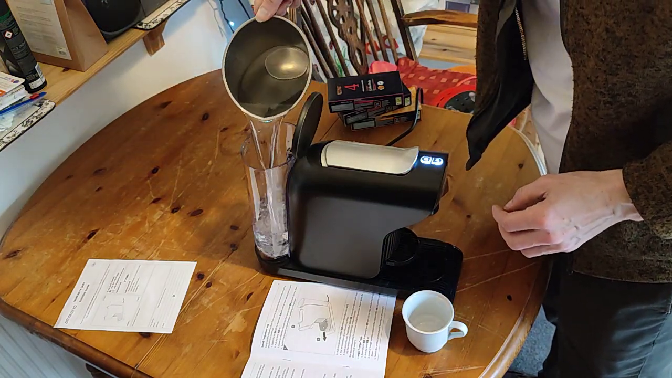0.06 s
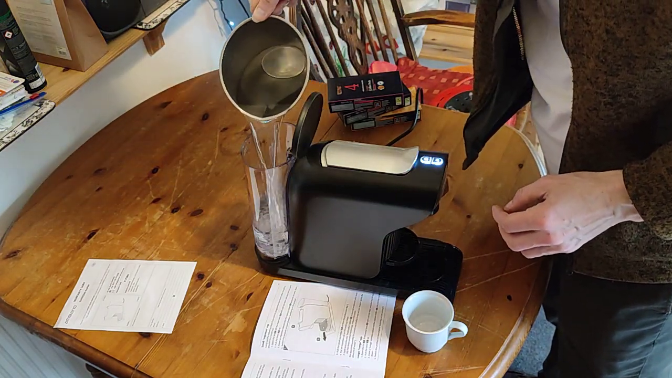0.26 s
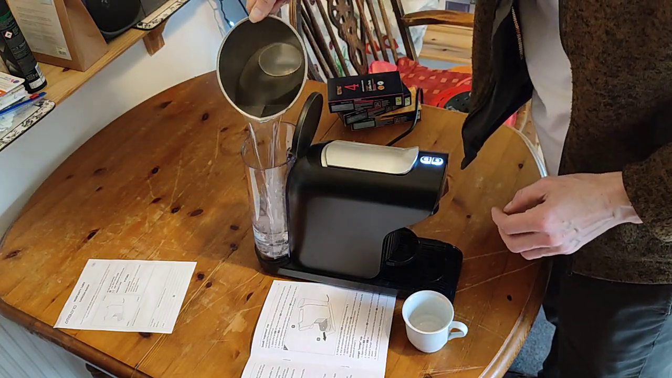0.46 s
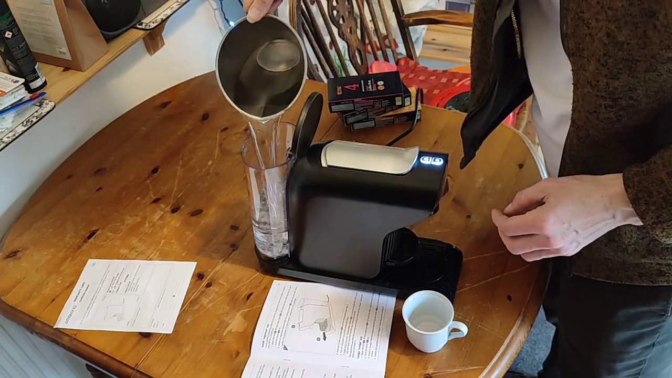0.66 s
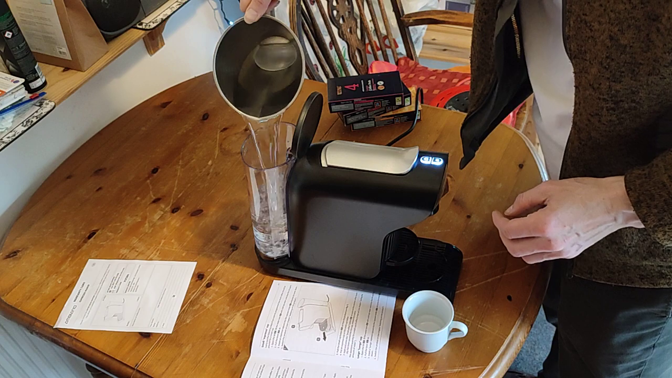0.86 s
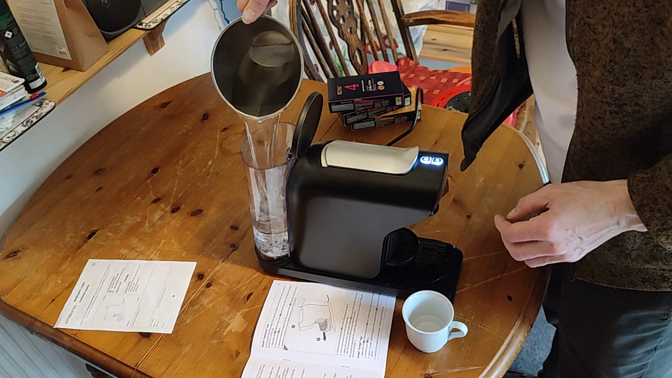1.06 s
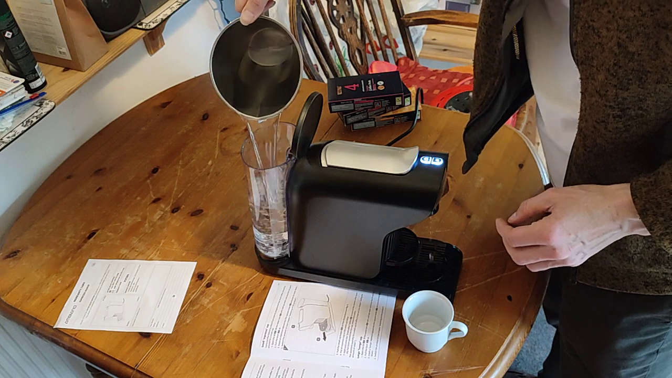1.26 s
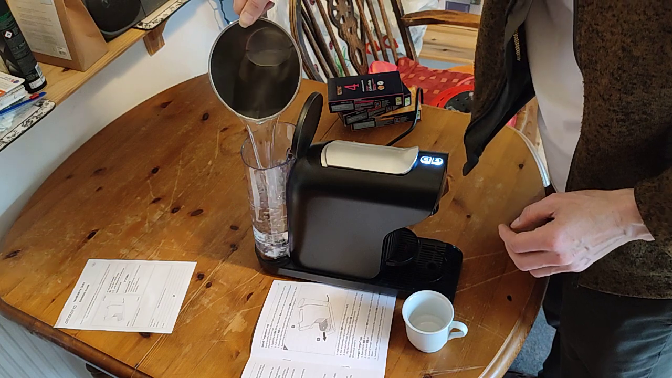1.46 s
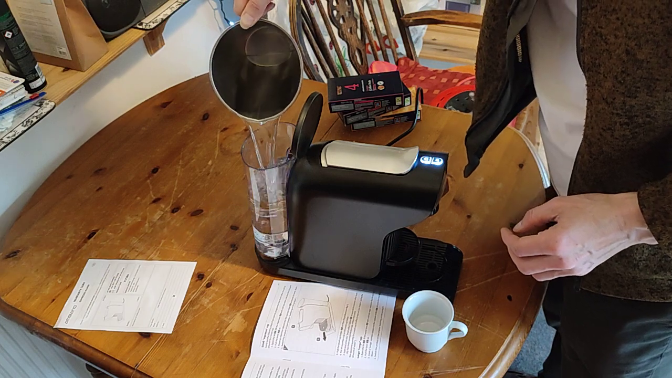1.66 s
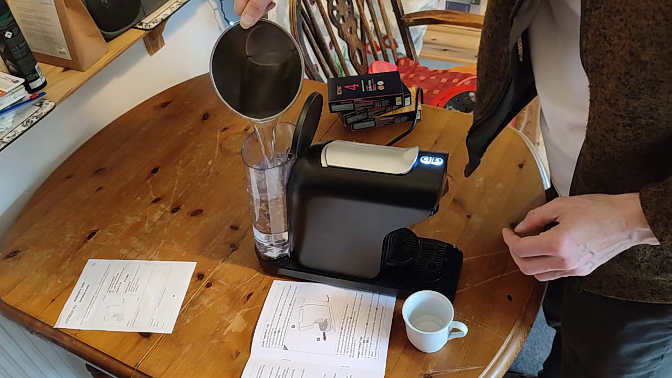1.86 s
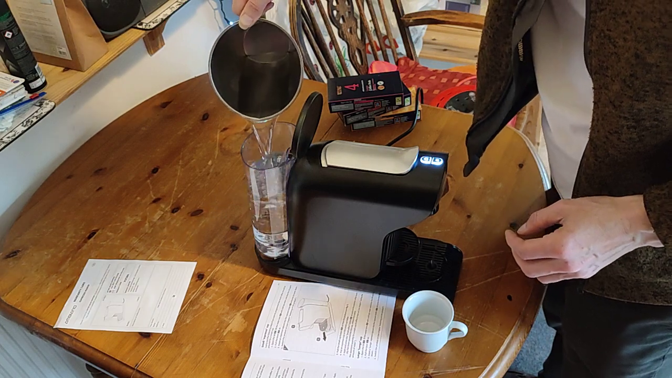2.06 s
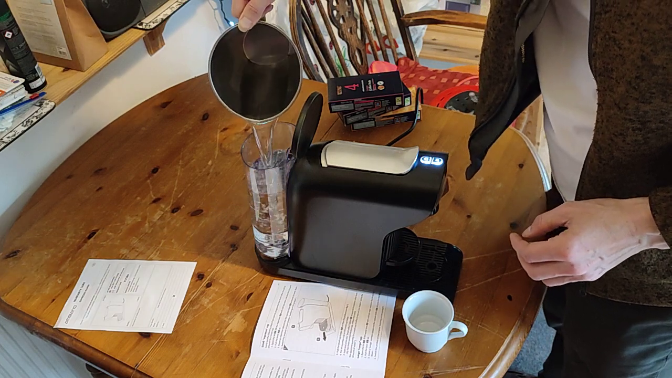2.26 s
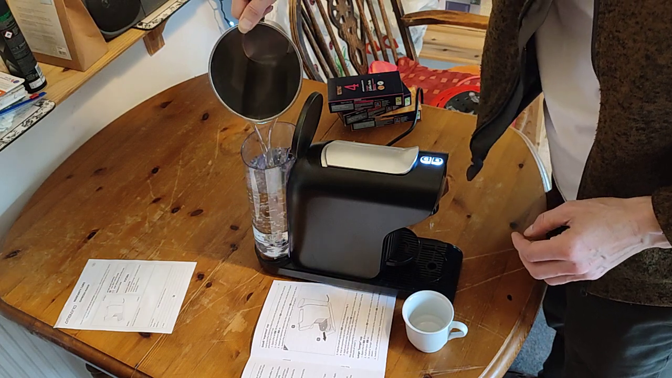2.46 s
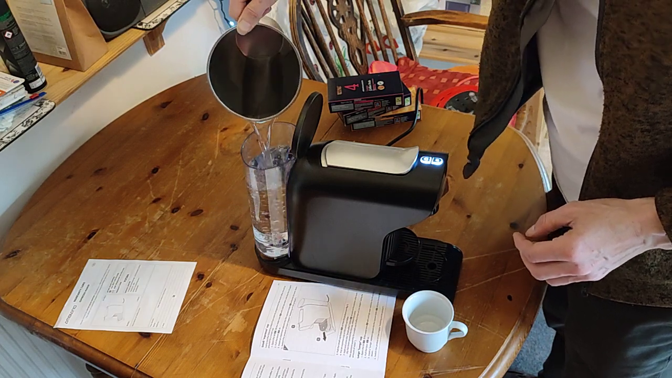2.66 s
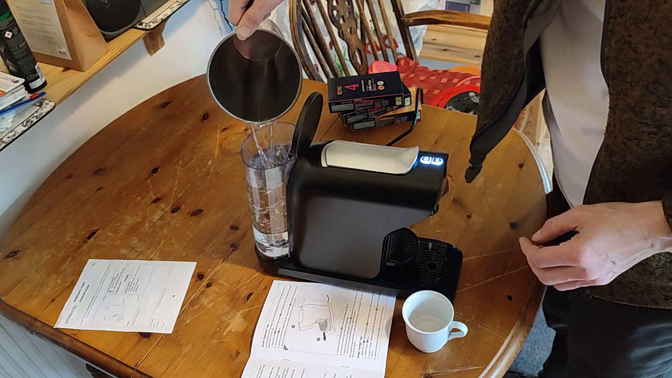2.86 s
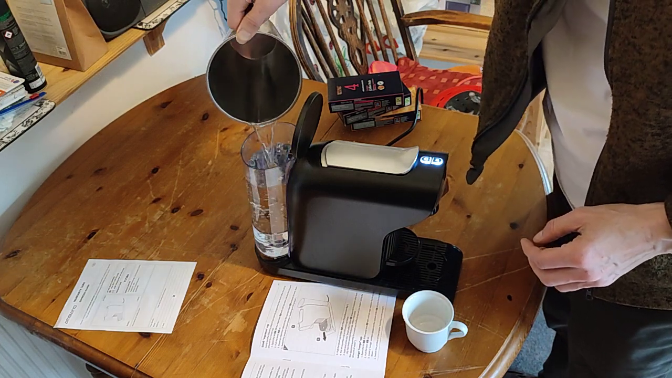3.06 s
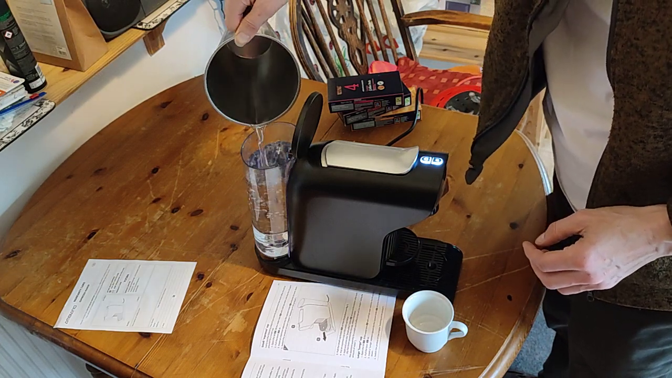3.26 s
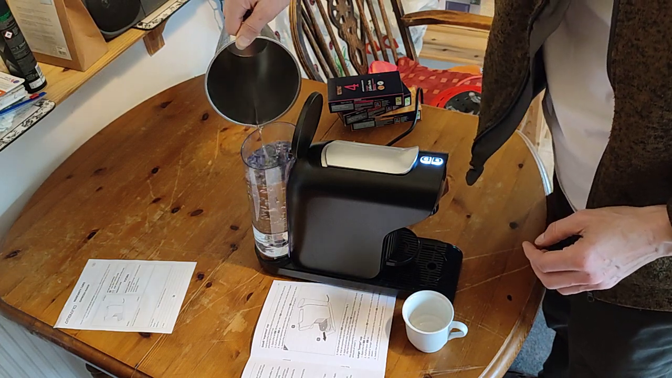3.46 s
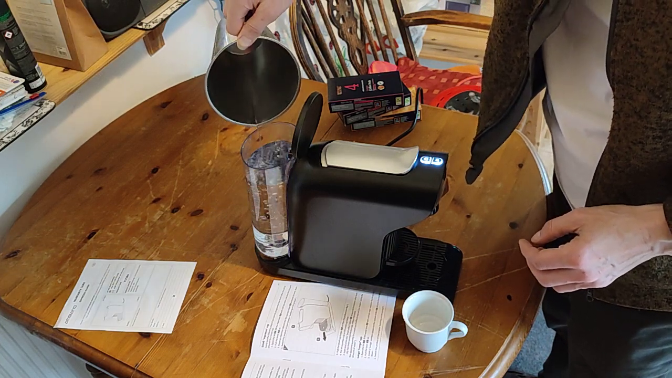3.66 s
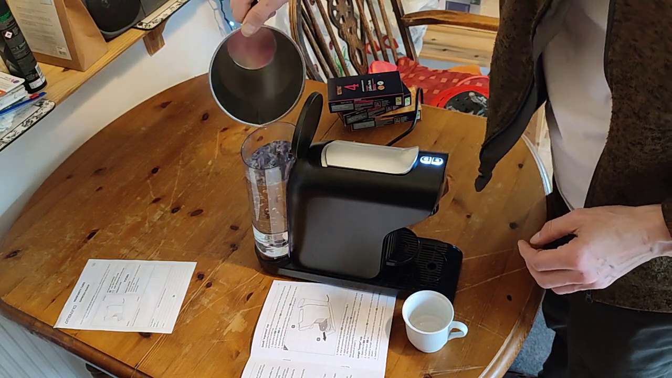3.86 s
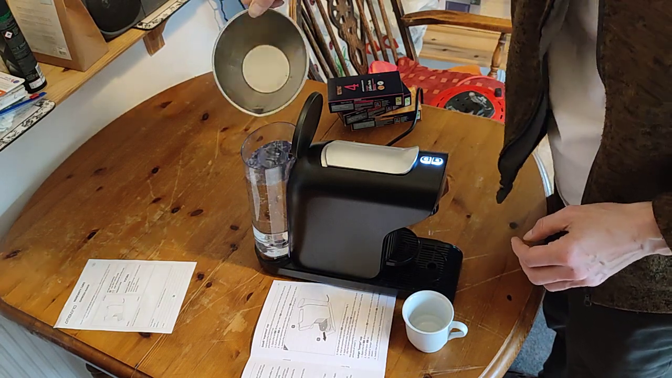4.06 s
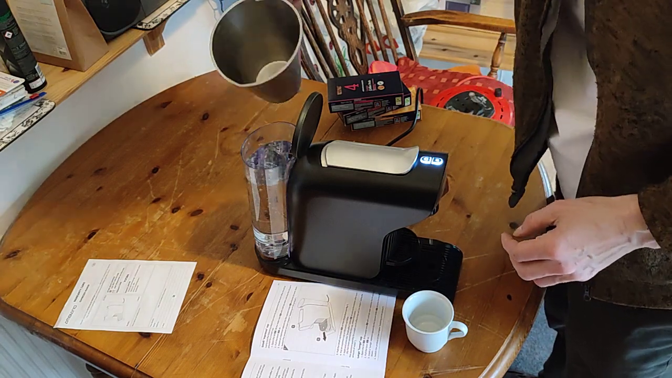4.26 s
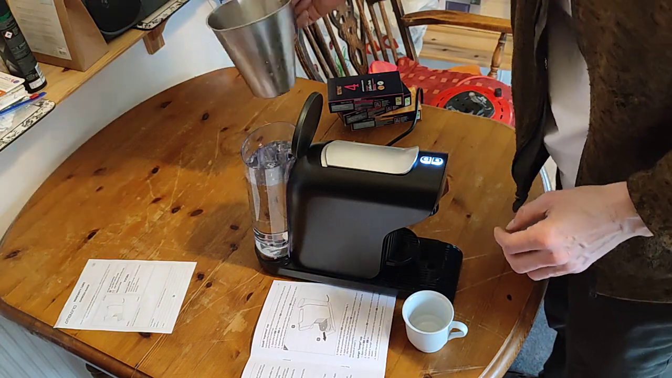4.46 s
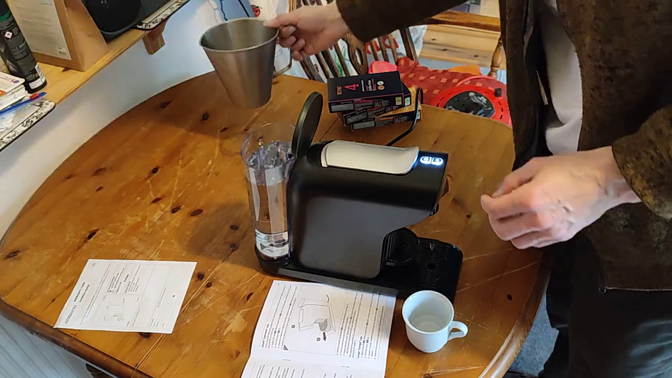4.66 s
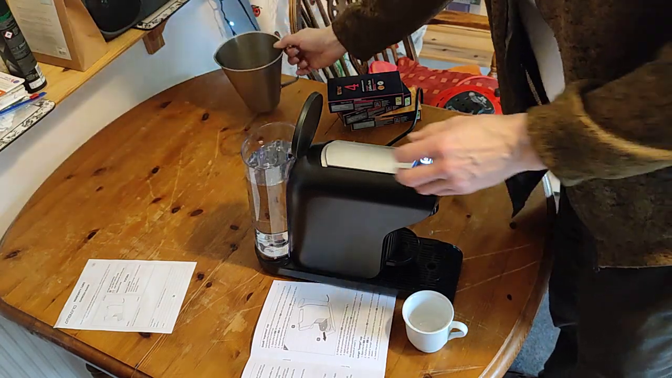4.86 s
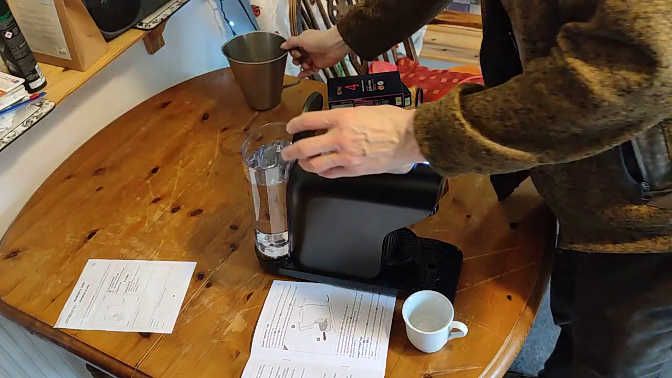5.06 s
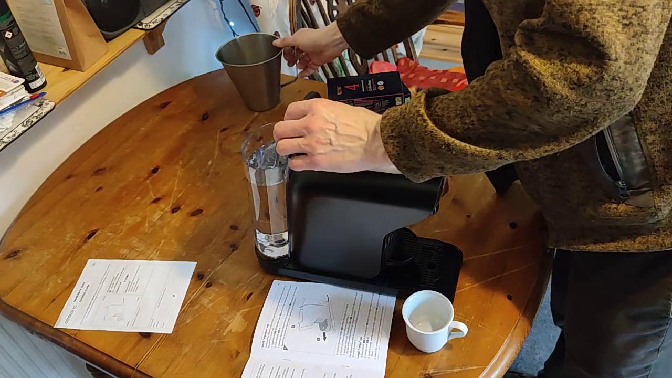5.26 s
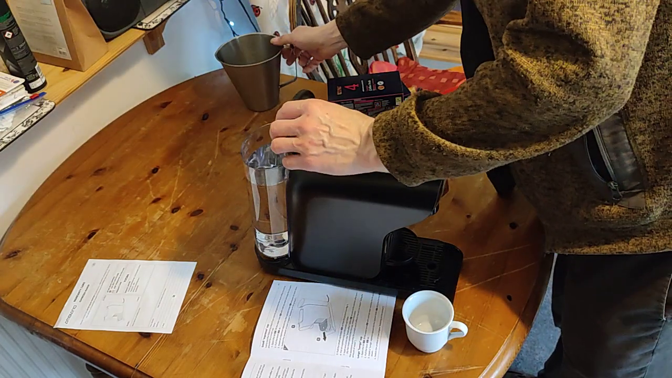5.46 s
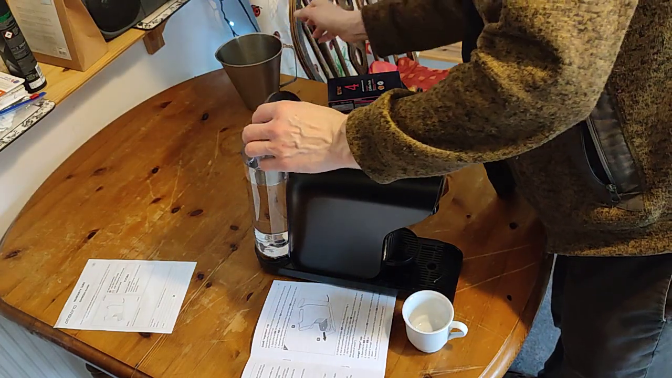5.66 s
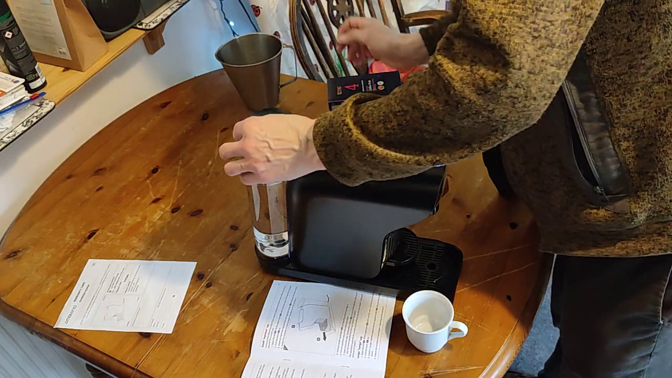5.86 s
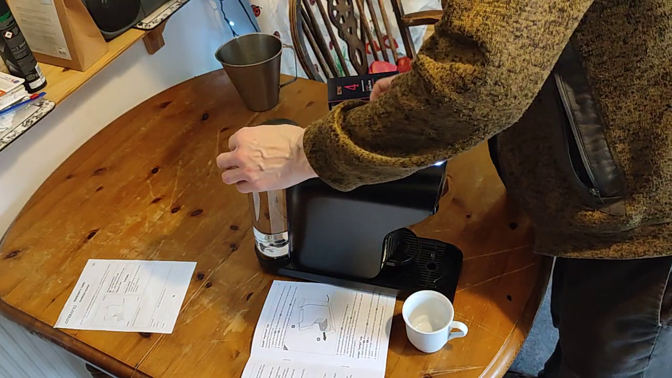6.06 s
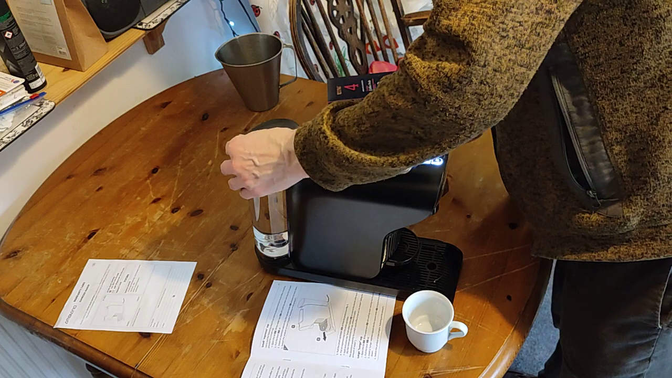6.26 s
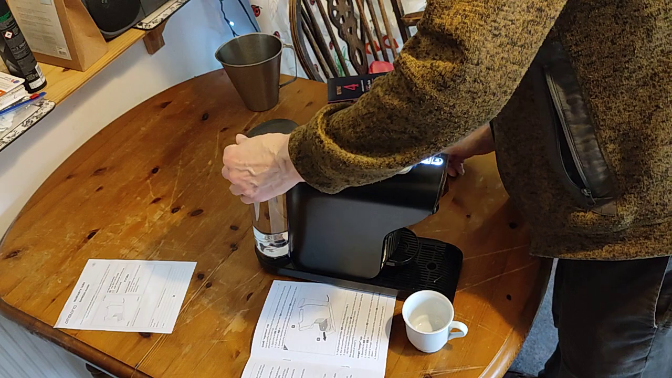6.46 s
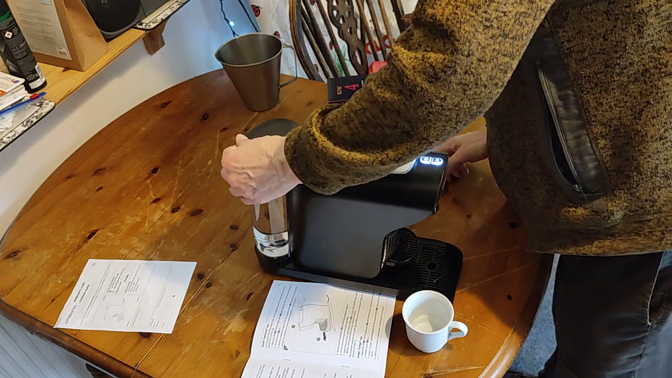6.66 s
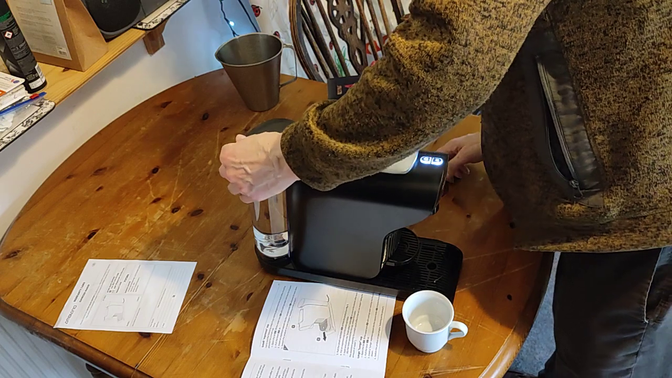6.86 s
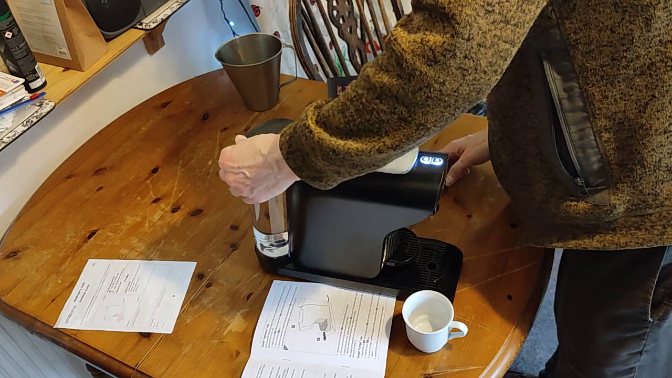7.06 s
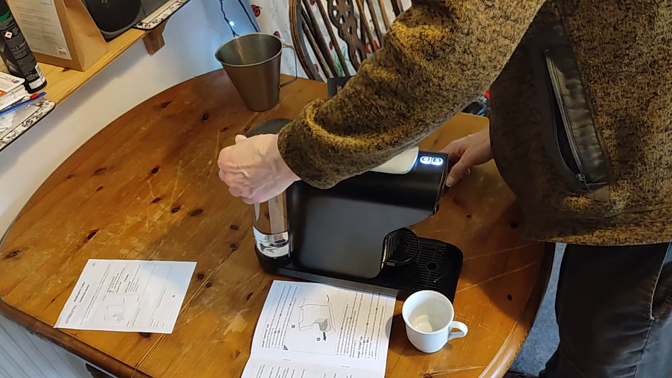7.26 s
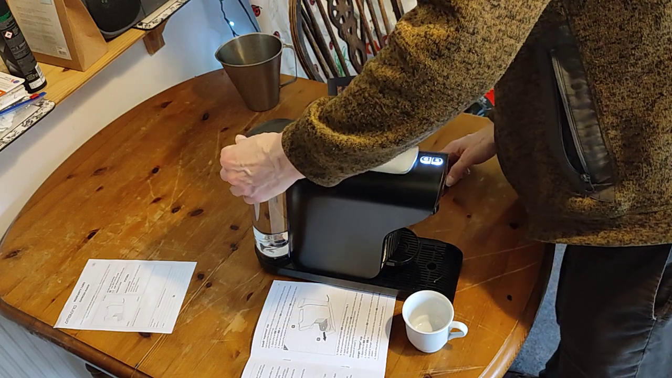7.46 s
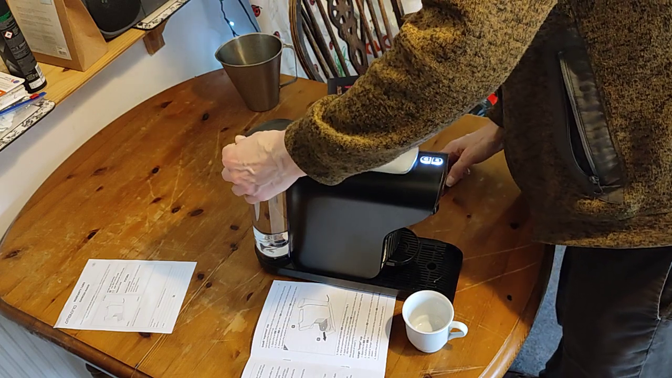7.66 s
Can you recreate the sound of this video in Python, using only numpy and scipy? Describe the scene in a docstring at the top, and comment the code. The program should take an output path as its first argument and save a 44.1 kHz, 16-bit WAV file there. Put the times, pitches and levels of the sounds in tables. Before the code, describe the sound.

Close in a small quiet kitchen, water splashes into a narrow plastic tank with a crackling patter and hollow drumming, soon softening to gurgles and single bubbly plips. After a near-silent pause with faint sleeve rustle, a metal jug lands hard on a wooden table, rocks flat, and a plastic lid is knocked and clacked shut. Stereo phone microphone, faint room hiss and low air rumble.

```python
"""A small kitchen: water is poured from a steel jug into a coffee machine's narrow plastic tank on a wooden table.
Random impacts, coloured and sent through the room, patter on the tank wall, then thin to a trickle with
single bubbles made of decaying sines. Coloured impacts rustle as a sleeve; banks of decaying modes and noise
bursts set the jug down hard, rock it flat and press the lid shut. A phone's two microphone ports listen."""
import sys
import numpy as np
from scipy import signal
from scipy.fft import rfft, irfft, next_fast_len
from scipy.io import wavfile

SR = 44100
rng = np.random.default_rng(int(sys.argv[2]) if len(sys.argv) > 2 else 0)


def wav_out(sig):
    """Save sig, one row per channel (or a flat mono array), as 16-bit PCM at SR to the path in sys.argv[1]."""
    wavfile.write(sys.argv[1], SR, np.round(np.clip(np.atleast_2d(sig).T, -1, 1) * 32767).astype(np.int16))


N = 339966
TIME = np.arange(N) / SR  # seconds

# Spectrum of the quiet kitchen. Each row: frequency in Hz, level in dB.
KITCHEN_COLOUR = [(20, 12.5), (45, 7.5), (90, 5), (135, 1.5), (200, -1.5), (400, -7.5), (510, -8),
                  (630, -8.5), (1000, -14.5), (1900, -12), (2350, -9.5), (2750, -15), (7000, -22.5),
                  (9000, -18), (12000, -12), (15500, -11)]
# Spectrum of air rumbling on the microphone. Each row: frequency in Hz, level in dB.
RUMBLE_COLOUR = [(3, -12.5), (11, -1.0), (18, -11), (30, -23), (60, -34.0), (200, -71), (1000, -110)]
# A steady rumble, and an early draught that dies away slowly.
RUMBLE_DB, DRAUGHT_DB, DRAUGHT_END_S, DRAUGHT_T60_S = -62, -54.5, 0.73, 7.6
ROOM_T60_S, ROOM_TREBLE_T60_S = 0.3, 0.13

# Spectrum of droplets on wall and water. Each row: frequency in Hz, level in dB.
PATTER_COLOUR = [(100, -20), (250, 0), (450, 5), (1000, -7.5), (1700, 4), (3000, 2.5), (4500, -5),
                 (7500, -2), (11000, -0.5), (15000, -4.5)]
# Spectrum of the tiny trapped bubbles. Each row: frequency in Hz, level in dB.
FIZZ_COLOUR = [(1000, -13.5), (2000, -13.5), (4000, 3), (8000, 5.5), (15000, 8)]
# The patter softens as the water deepens, and dies away once the stream meets the water.
PATTER_END_S, PATTER_DB, PATTER_SAG_DB_PER_S, PATTER_T60_S = 1.09, -52.5, 4.5, 0.8
# A quiet trickle runs beneath it and on until the jug is tipped back, then fades.
TRICKLE_END_S, TRICKLE_DB, TRICKLE_T60_S = 3.75, -77, 3
# Resonances of the plastic tank. Each row: frequency in Hz, level in dB, t60 in seconds, left minus right in dB.
TANK_MODES = [(129.8, -16, 0.077, 6), (256.4, 4.5, 0.092, 0.5), (307, -11.5, 0.085, -5),
              (560, -7, 0.095, -4), (679, 12, 0.076, -1), (895, -7, .05, 0)]
# Heavy slugs of water drum on the tank. Each row: start in seconds, level in dB.
SLUGS = [(0.077, -58.5), (.188, -55), (0.407, -58.5), (.579, -54.5), (.673, -53), (.836, -64),
         (.924, -58.5), (1.027, -57.5), (1.11, -62), (1.308, -63), (1.407, -62.5), (1.467, -63.5)]
DRUM_DB = -21  # the lighter drumming between them, against the patter

# The air above the water sings, mostly rising as the tank fills. Each row: time in seconds, pitch in Hz.
AIR_PITCH = [(0, 537), (.42, 531), (.56, 635), (.95, 655), (1.25, 656)]
# Its level against the patter, and one surge of the stream that makes it sing out.
AIR_DB, SURGE_S, SURGE_WIDTH_S, SURGE_DB = -11.5, 0.94, 0.015, -53

# Spectrum of the bubbles under the surface. Each row: frequency in Hz, level in dB.
BUBBLE_COLOUR = [(400, 1), (900, -6.5), (1400, -4), (2200, -1.5), (3000, 4), (5000, -15.5), (8000, -4),
                 (15000, 7)]
# The patter drags bubbles under, softer as the water deepens (level against the patter, before the trim).
DRAGGED_AIR_DB, DRAGGED_AIR_SAG_DB_PER_S = -5, 2.5
# The trickle breaks up and gurgles. Each row: start in seconds, length in seconds, relative bubbling level in dB.
GURGLES = [(1.277, 0.18, -66.5), (1.705, 0.47, -72), (2.06, 0.39, -66), (2.474, 0.42, -72.5),
           (3.317, .06, -74.5), (3.527, 0.12, -68.5)]
GURGLE_ATTACK_S, GURGLE_T60_S, GURGLE_SPRAY_DB = 0.052, 0.48, -3  # spray against the gurgling
# The largest single bubbles; the last four come ever lower.
# Each row: start in seconds, relative level in dB, starting pitch in Hz, cycles of ring to 60 dB down.
BUBBLES = [(.056, -41.5, 526, 20), (0.246, -48.5, 516, 16), (1.145, -47, 3010, 51),
           (1.268, -49.5, 4200, 59), (1.313, -52.5, 825, 11), (1.46, -55.5, 880, 25),
           (1.9, -36.5, 5300, 21), (2.023, -40, 8000, 24), (2.088, -44, 1050, 11.5), (2.139, -37, 6940, 28),
           (2.151, -49, 1010, 18), (2.166, -44, 4210, 48), (2.187, -42.5, 946, 17), (2.294, -41, 7290, 110),
           (2.297, -43, 6800, 64), (2.319, -50, 1004, 42), (2.347, -40, 1040, 5.6), (2.535, -50, 1150, 9.5),
           (2.677, -52.5, 8130, 200), (2.847, -55, 2560, 79), (2.904, -58.5, 873, 34),
           (3.464, -55.5, 1460, 30), (3.547, -52.5, 1620, 30), (3.584, -55, 2820, 52),
           (3.626, -48.5, 1260, 43), (3.666, -53, 1100, 25), (3.691, -53.5, 980, 46)]
# The loudest splashes and bursting bubbles. Each row: start in seconds, relative level in dB, centre in Hz.
SPLASHES = [(0.269, -49.5, 1810), (0.408, -52, 2100), (.521, -52, 2200), (.885, -45.5, 2000),
            (0.929, -42, 1900), (.984, -43, 2960), (1.145, -51, 2420), (1.176, -45, 1980),
            (1.324, -54.5, 2750), (2.012, -47, 11900), (2.139, -48, 8500), (2.249, -47.5, 12600),
            (2.368, -49.5, 10600), (2.522, -52.5, 12700), (2.8, -56, 7550), (3.192, -52.5, 12200),
            (3.478, -49, 12600), (3.587, -56.5, 11100), (3.664, -56.5, 10100)]
# Fine froth bursting on the surface.
FROTH_S, FROTH_END_S, FROTH_DB, FROTH_HZ = 2.1, 4.3, -74.5, 11850

# Spectrum of the brushed sleeve. Each row: frequency in Hz, level in dB.
SLEEVE_COLOUR = [(80, -10), (200, -5), (500, 2), (650, -5.5), (850, -2), (1100, -6), (2500, -8.5),
                 (5000, -14), (8000, -13), (15000, -19.5)]
# Arm movements that brush it. Each row: middle in seconds, half width in seconds, level in dB.
ARM_MOVES = [(4.35, 0.19, -78.5), (4.88, 0.11, -62.5), (5.25, 0.19, -68), (6.2, 0.27, -77.5)]
SLEEVE_STIR_DB, ARM_RESTS_S = -79.5, 5.4  # a faint stir that dies away once the arm rests

# Hand and lid on the tank.
# Each row: start in seconds, body level in dB, contact brightness in Hz, relative click level in dB.
LID_KNOCKS = [(4.688, -62.5, 600, -60), (5.407, -50.5, 3000, -37.5), (5.961, -54.5, 534, -61),
              (6.089, -39, 4000, -42), (6.097, -64, 600, -41.5), (6.316, -56, 710, -71),
              (6.351, -45.5, 201, -73), (6.527, -46, 121, -73)]
# Lid and housing on the table. Each row: frequency in Hz, level in dB, t60 in seconds, left minus right in dB.
LID_MODES = [(72, -14, .2, 6), (107.2, -14, 0.18, -2), (140, -27, 0.073, 7), (274, -7, 0.17, 3),
             (365.6, -2.5, 0.066, 2.5), (531.5, -0.5, 0.048, 0.5), (651, -0.5, 0.062, 2),
             (790, -17, 0.03, 13), (1090, -6, 0.033, -4), (2060, -2.5, 0.038, 3), (2850, -5, 0.037, -5),
             (4030, 0.5, 0.024, 1)]
# Spectrum of the lid's clicks. Each row: frequency in Hz, level in dB.
CLICK_COLOUR = [(100, -3), (600, -4.5), (1500, -1), (3000, -7.5), (5000, -9), (8000, -10.5), (15000, -21)]
# Touches ring the air under the lid, lower as the gap closes.
# Each row: start in seconds, level in dB, pitch in Hz, t60 in seconds.
LID_GAP = [(6.056, -52, 873, 0.078), (6.0745, -43, 695, 0.14)]
# Fingers slide on the plastic. Each row: start in seconds, level in dB, centre in Hz, length in seconds.
RUBS = [(6.026, -58.5, 1010, 0.039), (6.798, -72, 750, 0.048), (6.869, -73, 940, 0.069)]

# Steel jug standing on the table top; its nearly round wall rings in close pairs.
# Each row: frequency in Hz, level in dB, t60 in seconds, left minus right in dB.
JUG_MODES = [(93, -36.5, 0.24, 1), (134.8, -34.5, 0.35, 2), (182.1, -26.5, 0.16, 1), (226, -25.5, .17, 0.5),
             (355, -28.5, 0.23, 0), (494.3, -34, 0.27, -5), (627, 3, 0.051, -2.5), (549, -19, .27, -0.5),
             (603, -15.5, 0.24, 0), (680, -19.5, .19, -5), (808, -22, .22, -5), (998, -18, 0.23, -2.5),
             (1034, -20, 0.17, -3), (869, -25.5, 0.24, -5.5), (1120, -14, 0.1, -8), (1339, -17, 0.27, -3),
             (1360, -24.5, 0.21, -1.5), (1478, -32.5, 0.16, -3.5), (1770, -38.5, 0.14, 3.5),
             (1775, -36, 0.34, 2), (1890, -39, 0.11, -4.5), (2044, -25.5, 0.088, -2),
             (3015, -43.5, 0.38, -6.5), (3057, -42.5, .25, -7), (5390, -46, .33, -5),
             (5465, -40, .25, -2.5), (6214, -44, .2, -3.5), (8360, -46.5, .22, 3), (8730, -46.5, 0.18, 8.5),
             (11770, -42, .2, 2.5), (12274, -45.5, .25, -2), (14020, -44.5, 0.2536, 3)]
# The jug lands and rocks flat. Each row: start in seconds, level in dB against the landing, contact brightness in Hz.
JUG_BLOWS = [(5.0114, 0, 18000), (5.3412, -21, 780), (5.3479, -25.5, 680)]
# Dull clatter of the table under the jug. Each row: frequency in Hz, level in dB.
TABLE_COLOUR = [(40, -46), (95, -16), (200, 2), (420, -7), (700, -6), (1200, -1.5), (2000, -12.5),
                (2600, -23), (5000, -27), (8000, -32.5), (15000, -37)]

TOP_HZ = 15550  # nothing much is heard above this


def undb(db):
    """Decibels to gain."""
    return 10 ** (np.asarray(db) / 20)


def unit(x):
    """Scale to an rms of 1."""
    return x / np.sqrt(np.mean(x ** 2))


def fade(t, t60):
    """Exponential decay, 60 dB down after t60."""
    return np.exp(-np.log(1000) * t / t60)


def spell(start_s, end_s, attack_s, t60):
    """Gain that rises, holds until end_s and then dies away."""
    rise = np.clip((TIME - start_s) / attack_s, 0, 1)
    return rise * fade(np.maximum(TIME - end_s, 0), t60)


def swell(middle_s, width_s):
    """Gain that rises and falls smoothly round one moment."""
    return np.exp(-.5 * ((TIME - middle_s) / width_s) ** 2)


def pan(x, left_db):
    """Tilt the balance towards the left."""
    return x * undb(np.array([[left_db], [-left_db]]) / 2)


def add(out, s, sound):
    """Mix a sound in at time s."""
    i = max(int(s * SR), 0)
    out[..., i:i + sound.shape[-1]] += sound[..., :max(N - i, 0)]


def colour(x, points):
    """Causal minimum-phase filter that follows (Hz, dB) points."""
    hz, db = np.transpose(points)
    size = 2 * next_fast_len(x.shape[-1] // 2 + 2048)
    f = np.maximum(np.arange(size // 2 + 1) * SR / size, 1)
    gain = undb(np.interp(np.log(f), np.log(hz), db))
    # folding the cepstrum forward in time makes the filter causal
    cepstrum = irfft(np.log(gain))
    cepstrum[1:size // 2] *= 2
    cepstrum[size // 2 + 1:] = 0
    response = np.exp(rfft(cepstrum))
    return irfft(rfft(x, size) * response, size)[..., :x.shape[-1]]


def diffuse(count, split_hz=1100):
    """Stereo noise arriving from all round: alike in the bass, unrelated in the treble."""
    mid, side = rfft(rng.standard_normal((2, count)))
    f = np.arange(len(mid)) * SR / count
    alike = .95 / (1 + (f / split_hz) ** 2)
    mid, side = mid * np.sqrt(1 + alike), side * np.sqrt(1 - alike)
    return unit(irfft(np.array([mid + side, mid - side]), count))


def burst(points, t60):
    """A dying puff of coloured stereo noise."""
    t = TIME[:SR // 2]
    return unit(colour(diffuse(len(t)), points)) * fade(t, t60)


def ring(modes, contact_hz, rise_s, spread_hz=1500):
    """Stereo ring of a struck body; a soft contact spares the high modes, and the left leads in phase."""
    t, out = TIME[:SR // 2], 0
    for hz, db, t60, left_db in modes:
        skew = min(hz / spread_hz, np.pi / 4) * np.array([[1], [-1]])
        size = undb(db) / np.sqrt(1 + (hz / contact_hz) ** 10)
        tone = size * fade(t, t60) * np.sin(2 * np.pi * hz * t + skew)
        out = out + pan(tone, left_db)
    return out * (1 - np.exp(-t / rise_s))


def room(x, wet_db, gap_s=0.0051):
    """Direct sound plus the dense echoes of a small kitchen, whose treble dies first."""
    t, noise = TIME[:SR // 2], diffuse(SR // 2)
    low = signal.sosfilt(signal.butter(1, 2000, fs=SR, output="sos"), noise)
    echoes = low * fade(t, ROOM_T60_S) + (noise - low) * fade(t, ROOM_TREBLE_T60_S)
    echoes = echoes * np.clip(t / gap_s - .5, 0, 1)  # a short gap before the echoes build
    echoes = unit(echoes) / np.sqrt(len(t))
    return x + undb(wet_db) * signal.fftconvolve(np.atleast_2d(x), echoes, axes=1)[:, :N]


def impacts(rate, scatter_db):
    """Randomly timed impacts at a mean rate per second, of exponentially scattered dB size and random sign."""
    chance, size = rng.random(N), np.minimum(rng.exponential(size=N), 4)
    return unit((chance < rate / SR) * undb(scatter_db * size) * rng.choice([-1, 1], N))


def bubble(hz, cycles, glide=0.076, lag_s=.00008, rise_cycles=0.56):
    """A trapped bubble rings and sharpens as it rises; it reaches the left port first."""
    t = TIME[:int(cycles / hz * SR) + 2]
    age = np.maximum(t - np.array([[0], [lag_s]]), 0)
    tone = np.sin(2 * np.pi * hz * age * (1 + glide * age * hz / cycles))
    return tone * fade(age, cycles / hz) * (1 - np.exp(-age * hz / rise_cycles))


def swarm(end_s, low_hz, octaves, cycles, scatter_db, count):
    """Bubbles at random times and pitches, mostly faint with a few strong ones."""
    out = np.zeros((2, N))
    for when, pitch, strength, life in rng.random((count, 4)):
        size = undb(scatter_db * min(-np.log(1 - strength), 3))
        hz = min(low_hz * 2 ** (octaves * pitch), SR / 3)
        add(out, when * end_s, size * bubble(hz, cycles * (.5 + life)))
    return unit(out)


def pattering():
    """How hard the stream hits the tank wall."""
    sagging = undb(PATTER_DB - PATTER_SAG_DB_PER_S * TIME)
    return sagging * fade(np.maximum(TIME - PATTER_END_S, 0), PATTER_T60_S)


def gurgling():
    """How much air the trickle carries under the surface."""
    power = 0
    for s, length_s, db in GURGLES:
        power = power + (undb(db) * spell(s, s + length_s, GURGLE_ATTACK_S, GURGLE_T60_S)) ** 2
    return np.sqrt(power)


def kitchen():
    """Steady room noise, and a slow rumble of air that is stronger on the right port."""
    hush = unit(colour(diffuse(N, split_hz=110), KITCHEN_COLOUR)) * undb(-64.5)
    air = unit(colour(diffuse(N, split_hz=17), RUMBLE_COLOUR))
    draught = undb(DRAUGHT_DB) * spell(0, DRAUGHT_END_S, attack_s=0.3, t60=DRAUGHT_T60_S)
    return hush + pan(air, left_db=-3.5) * (undb(RUMBLE_DB) + draught)


def stream():
    """Droplets crackle on wall and water and trap tiny bubbles; the heavier slugs drum on the tank."""
    crackle = unit(colour(impacts(rate=750, scatter_db=4.5), PATTER_COLOUR))
    fizz = swarm(TRICKLE_END_S + .5, low_hz=1100, octaves=3.7, cycles=24, scatter_db=4.5, count=4500)
    fizz = unit(colour(fizz, FIZZ_COLOUR))
    patter = unit(room(crackle + fizz, wet_db=1))
    trickle = undb(TRICKLE_DB) * fade(np.maximum(TIME - TRICKLE_END_S, 0), TRICKLE_T60_S)
    spray = undb(GURGLE_SPRAY_DB) * gurgling()
    force = np.sqrt(pattering() ** 2 + trickle ** 2 + spray ** 2)
    wall = ring(TANK_MODES, contact_hz=533, rise_s=0.0021)
    drum = signal.fftconvolve(impacts(rate=89, scatter_db=-1)[None], wall, axes=1)[:, :N]
    drum = unit(drum) * pattering() * undb(DRUM_DB)
    for s, db in SLUGS:
        add(drum, s, undb(db) * wall)
    return patter * force + room(drum, wet_db=-5.5)


def air_column(width_hz=26):
    """Impacts keep the air in the tank ringing in a narrow band that follows its pitch."""
    turn = np.exp(2j * np.pi * np.cumsum(np.interp(TIME, *np.transpose(AIR_PITCH))) / SR)
    # shift the pitch down to zero, keep the narrow band there, then shift it back up
    narrow = signal.butter(2, width_hz / 2, fs=SR, output="sos")
    ringing = signal.sosfilt(narrow, impacts(rate=620, scatter_db=2.5) / turn)
    drive = undb(AIR_DB) * pattering() + undb(SURGE_DB) * swell(SURGE_S, SURGE_WIDTH_S)
    return unit(room((ringing * turn).real, wet_db=-5)) * drive


def bubbling():
    """Larger bubbles carried under the surface by the stream ring in a random swarm."""
    bubbles = swarm(TRICKLE_END_S + .5, low_hz=750, octaves=4.2, cycles=36, scatter_db=5, count=900)
    dragged = pattering() * undb(DRAGGED_AIR_DB - DRAGGED_AIR_SAG_DB_PER_S * TIME)
    carried = np.hypot(dragged, gurgling())
    return unit(room(colour(bubbles, BUBBLE_COLOUR), wet_db=7.0)) * carried * undb(-0.5)


def sleeve():
    """Wool fibres brush past each other as the arm reaches across."""
    stir = undb(SLEEVE_STIR_DB) * fade(np.maximum(TIME - ARM_RESTS_S, 0), t60=3.3)
    power = stir ** 2
    for s, width_s, db in ARM_MOVES:
        power = power + (undb(db) * swell(s, width_s)) ** 2
    rustle = colour(impacts(rate=1200, scatter_db=3), SLEEVE_COLOUR)
    return unit(room(rustle, wet_db=5.5)) * np.sqrt(power)


def drops():
    """The larger bubbles ring and the splashes puff as noise, standing out of the stream."""
    plips, splats = np.zeros((2, 2, N))
    for s, db, hz, cycles in BUBBLES:
        add(plips, s, undb(db) * bubble(hz, cycles))
    for s, db, hz in SPLASHES:
        band = [(hz / 5, -20), (hz / 1.4, -1), (hz * 1.3, 0), (hz * 3, -18)]
        add(splats, s, undb(db) * burst(band, t60=0.023))
    return undb(1.5) * room(plips, wet_db=-1.0) + room(splats, wet_db=1)


def froth():
    """Tiny bubbles burst on the surface in faint, high ticks."""
    ticks = colour(impacts(rate=30, scatter_db=6.5), [(FROTH_HZ / 3, -24), (FROTH_HZ, 0)])
    return unit(room(ticks, wet_db=2.5)) * undb(FROTH_DB) * spell(FROTH_S, FROTH_END_S, attack_s=.1, t60=2.5)


def lid():
    """Knocks ring the plastic lid with a noisy click; touches ring the air beneath it and fingers rub."""
    out = np.zeros((2, N))
    for s, body_db, contact_hz, click_db in LID_KNOCKS:
        add(out, s, undb(body_db) * ring(LID_MODES, contact_hz, rise_s=0.00072))
        add(out, s, undb(click_db - 8.5) * burst(CLICK_COLOUR, t60=0.085))
    for s, db, hz, t60 in LID_GAP:
        add(out, s, ring([(hz, db, t60, 0)], contact_hz=SR, rise_s=0.00013))
    for s, db, hz, length_s in RUBS:
        band = [(hz / 3, -18), (hz / 1.3, -10), (hz, 0), (hz * 1.4, -12), (hz * 5, -36)]
        grit = unit(colour(diffuse(SR // 2), band))
        stroke = np.sin(np.pi * np.minimum(TIME[:SR // 2] / length_s, 1))
        add(out, s, undb(db) * grit * stroke)
    return room(out, wet_db=-5.5)


def jug():
    """The steel jug strikes the wooden table: its modes ring while noise bursts make the table clatter."""
    tone, clatter = np.zeros((2, 2, N))
    for s, db, contact_hz in JUG_BLOWS:
        add(tone, s, undb(db) * ring(JUG_MODES, contact_hz, rise_s=.0034))
        # a softer contact also dulls the table
        softened = [(hz, level - 20 * np.log10(1 + (hz / contact_hz) ** 4)) for hz, level in TABLE_COLOUR]
        rattle = burst(softened, t60=.16) + .7 * burst(softened, t60=.025)
        add(clatter, s, undb(db - 21) * rattle)
    return room(tone, wet_db=-21) + room(clatter, wet_db=-6)


def scene():
    """All sources at their places."""
    water = stream() + air_column() + bubbling() + drops() + froth()
    return pan(water, left_db=-0.27) + jug() + pan(lid() + sleeve() + kitchen(), left_db=-1)


def record(dry):
    """The treble is dulled, on the right from a little lower; then the very top is cut."""
    dulled = []
    for x, edge_hz in zip(dry, (8600, 7600)):
        dulled.append(colour(x, [(edge_hz, 0), (edge_hz * 1.09, -14), (12000, -10)]))
    return signal.sosfilt(signal.ellip(10, .2, 70, TOP_HZ, fs=SR, output="sos"), dulled)


dry = scene()
out = record(dry)
wav_out(out)
```